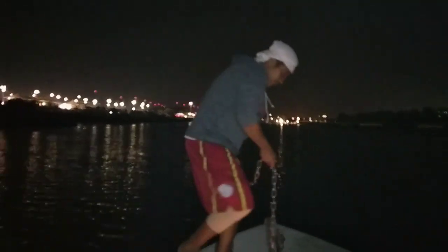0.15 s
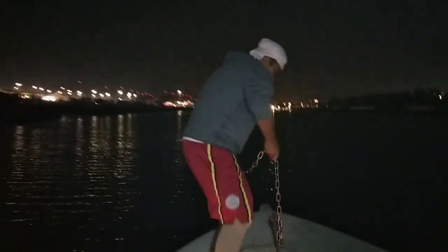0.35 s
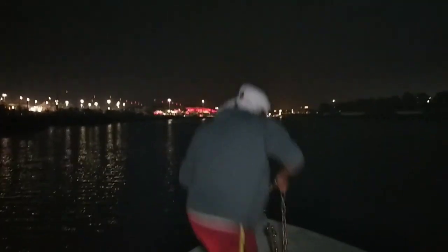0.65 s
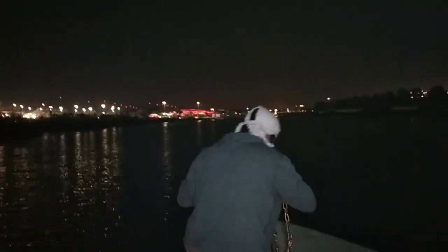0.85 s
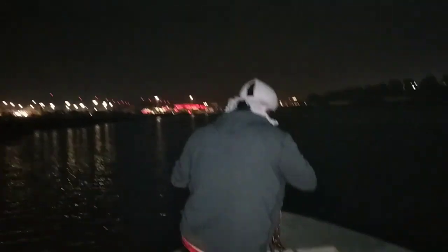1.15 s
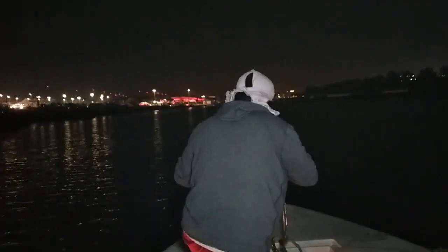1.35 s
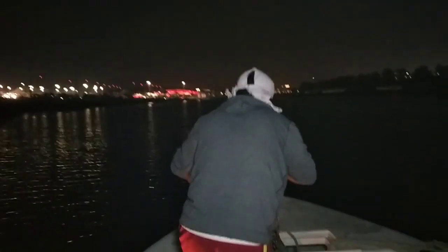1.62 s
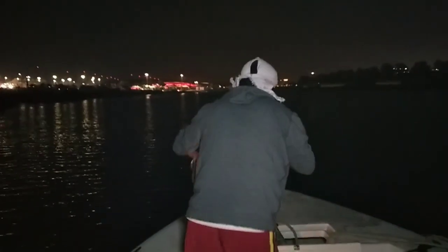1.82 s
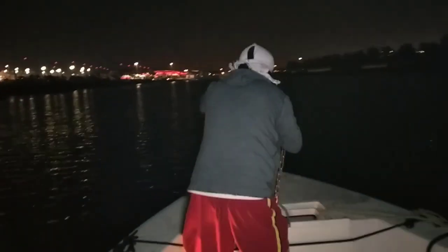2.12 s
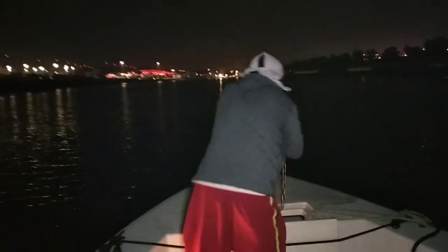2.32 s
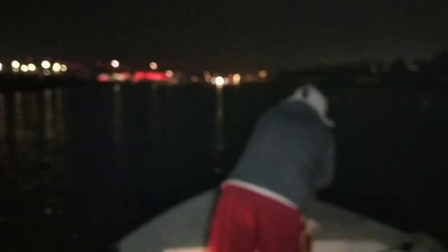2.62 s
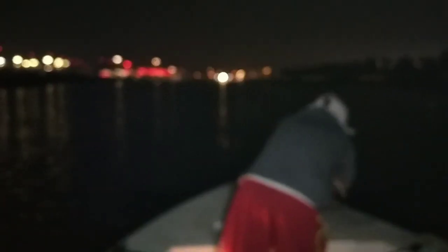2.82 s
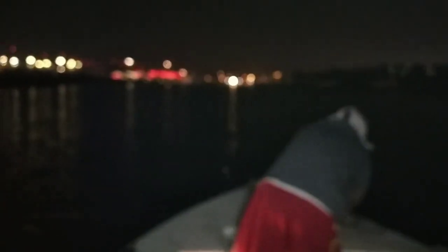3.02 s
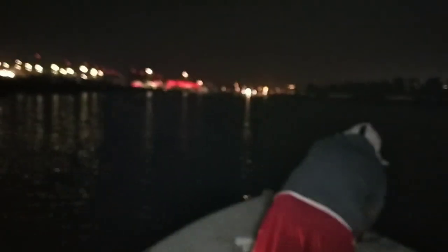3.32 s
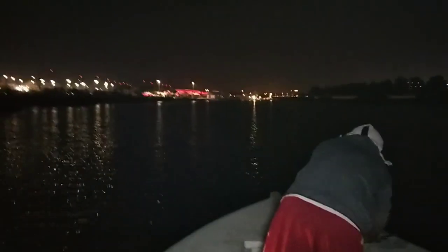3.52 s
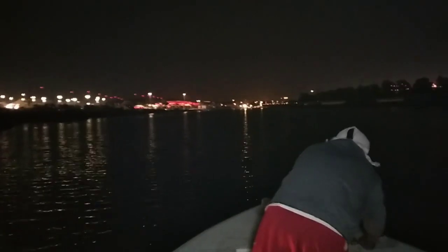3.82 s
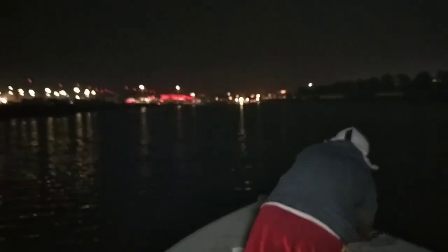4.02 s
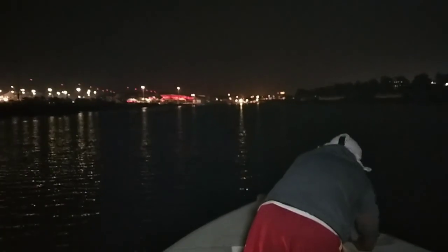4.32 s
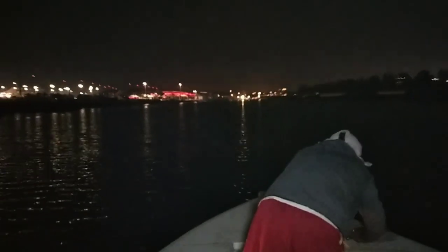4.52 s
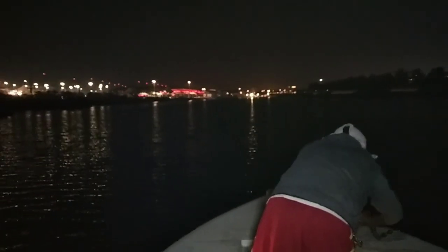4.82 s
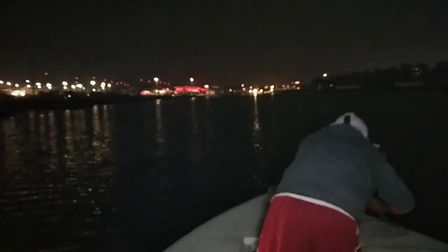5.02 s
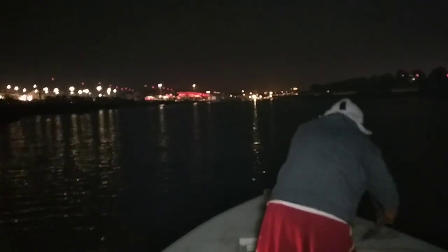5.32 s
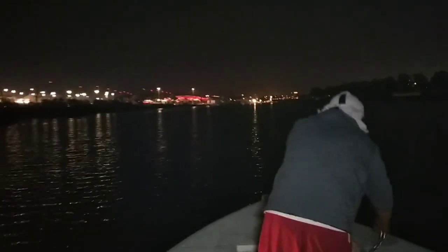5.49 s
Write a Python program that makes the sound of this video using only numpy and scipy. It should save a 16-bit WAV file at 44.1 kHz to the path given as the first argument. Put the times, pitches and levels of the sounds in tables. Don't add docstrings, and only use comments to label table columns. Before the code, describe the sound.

Anchor chain links rattle, knock and clack on a hollow boat bow in several rough pulls, between quieter pauses with low wind buffeting.

```python
import sys
import numpy as np
from scipy import signal
from scipy.io import wavfile

SR = 44100
rng = np.random.default_rng(int(sys.argv[2]) if len(sys.argv) > 2 else 0)


def gain_from_db(level_db):
    decades = np.asarray(level_db, float) / 20
    return 10 ** decades


def persist_wave(psi):
    counts = np.round(np.clip(psi, -1, 1) * 32767).astype(np.int16)
    wavfile.write(sys.argv[1], SR, np.atleast_2d(counts).T)


N = 249253
DECK_TOP_HZ = 3400

# time_s, force_db, slack_db
PULL_1 = [
    (0.447, -84, -55),
    (0.462, -22.5, -53.5),
    (.538, -26, -18),
    (.6, -24, -21),
    (.664, -26, -8),
    (.808, -20.5, -10),
    (0.9, -36.5, -11),
    (1.081, -47.5, -22),
]
PULL_2 = [
    (1.089, -48, -55),
    (1.118, -34, -10),
    (1.268, -18.5, -30.5),
    (1.358, -12.5, -15.5),
    (1.44, -40, -23.5),
    (1.461, -22.5, -8),
    (1.549, -39, -15.5),
    (1.61, -65, 4),
]
PULL_3 = [
    (2.584, -51.5, -29.5),
    (2.591, -12.5, -38),
    (2.642, -12, -24.5),
    (2.762, -12, -14.5),
    (2.954, -11, -11.5),
    (3.182, -20, -8.5),
    (3.265, -17, -15.5),
    (3.315, -18.5, -10),
    (3.491, -61.5, -8),
]
PULL_4 = [
    (4.22, -53, -27),
    (4.286, -37.5, -39),
    (4.312, -17, -28),
    (4.45, -21.5, -20),
    (4.594, -18, -27.5),
    (4.694, -13.5, -13),
    (4.816, -21.5, -18),
    (4.862, -21, -8.5),
]
PULL_5 = [
    (4.862, -20, -28),
    (4.934, -12.5, -14),
    (4.998, -36, 2),
    (5.016, -26, -10.5),
    (5.032, -7.5, -22),
    (5.136, -15, -9.5),
    (5.156, -18, -20.5),
    (5.254, -31, -21),
]
PULL_6 = [
    (5.254, -39.5, -23),
    (5.285, -19, -11),
    (5.31, -19, -22),
    (5.39, -19, -42),
    (5.429, -9.5, -16),
    (5.484, -26, -25.5),
    (5.507, -13.5, -19),
    (5.558, -24.5, -7.5),
    (5.65, -88.5, 51.5),
]
# deck_weight_db, link_hardness_db, left_minus_right_db
PULL_LAYS = [
    (1.5, -2.5, 1.5),
    (-9.5, -2, 2.5),
    (6.5, 2, 4.5),
    (4.5, -2.6, 2),
    (-0.5, 2.5, 2.5),
    (6.5, 2, 3),
]
# start_s, force_db, slack_db, held_s, left_minus_right_db
SLIPS = [(0.011, -24, -35, 0.01, 2.5), (0.192, -49.5, -12, 0.021, 3), (0.231, -57.5, 6, 0.0071, 11),
         (.29, -61, 13, 0.0072, 2), (1.887, -31.5, -16, 0.03, 1), (1.983, -33, -16, 0.041, 10.5),
         (2.155, -23, -11, 0.03, -0.5), (2.468, -60.5, 12, 0.023, 15), (3.457, -52, -4, 0.029, 2),
         (3.568, -45, -21, 0.0054, 4), (3.601, -31, -2.5, 0.023, 2.5), (3.679, -38.5, -30, 0.035, 3),
         (3.817, -36, -36, 0.035, 5), (3.892, -46, -27, 0.0064, 5), (4.011, -40.5, -43, 0.034, 0.5),
         (4.134, -48.5, -32, 0.018, 1), (4.152, -62, 5, 0.017, 2), (1.76, -54, 2, .015, 8),
         (1.85, -51.5, -35, 0.011, 6), (.395, -66, 5, .012, -3), (3.536, -52, -6, 0.027, 7),
         (3.44, -50, -47, 0.12, 2), (3.76, -53.5, -53, 0.042, -1)]
# start_s, length_s, level_db
SLIDES = [(1.551, 0.16, -53), (1.74, 0.15, -68), (2.215, 0.22, -61.5), (2.46, 0.07, -53.5),
          (.95, 0.091, -59), (3.668, 0.057, -60), (0, 0.069, -55), (0.193, .075, -74), (.29, 0.035, -79),
          (1.03, 0.063, -61), (3.462, 0.036, -59), (3.826, 0.051, -62), (4, .05, -68), (.105, 0.0062, -66),
          (.397, .012, -75), (3.542, 0.027, -71), (4.09, 0.017, -74.5), (4.15, 0.013, -73),
          (4.25, .03, -76)]
# time_s, pitch_hz
BEARING = [(.46, 990), (.56, 1000), (.65, 1500), (.9, 1470), (1.12, 950), (1.26, 1230), (1.4, 1230),
           (1.5, 1386), (2.6, 1145), (2.72, 1060), (2.8, 1500), (3.35, 1510), (4.3, 1250), (4.8, 1070),
           (4.9, 1400), (5.24, 1340), (5.3, 676), (5.42, 970)]
# pitch_hz, level_db
DECK = [(150, -6), (290, -1), (490, -2), (825, -1), (1400, 3), (2050, -1), (2600, -8), (3300, -19)]
# pitch_hz, level_db, t60_s
PLATES = [(289.3, -3, 0.13), (602.5, -3, 0.11), (681.6, -1.5, 0.071), (819.4, -4.5, 0.056),
          (917, -2.5, 0.043), (1040, -4.5, 0.045), (1234, -2.5, 0.04), (1330, -2.5, 0.052),
          (1463, -4.5, 0.065), (1561, -4.5, 0.02), (1843, 0, 0.031), (2047, 0, 0.026), (2425, 0, .04),
          (2790, -6, .04)]
# pitch_hz, level_db
CLACK = [(3000, 5.5), (4500, 2.5), (6300, -4.5), (7600, -0.5), (10000, -8), (12800, 3), (14100, -3),
         (15400, -29.5)]
# pitch_hz, level_db, t60_s
LINKS = [(10900, -15, .03), (11190, 1.5, 0.043), (11200, 5, 0.13), (11430, 1.5, 0.044),
         (11340, -6.5, 0.039), (11650, 6, 0.071), (11620, -0.5, .04), (11720, -1.5, 0.026),
         (10600, -12.5, .02), (12400, -11, 0.056), (12150, -26, .015), (12850, -23, .02)]
# centre_hz, t60_s, left_minus_right_db
SPOTS = [
    (584, 0.065, -2),
    (1000, 0.062, -4.7),
    (1395, 0.056, -2.5),
    (1500, 0.04, 4.5),
    (1980, 0.054, 1),
    (1340, 0.032, 4),
]
# time_s, peak_db
ON_FLOORBOARD = [(1.951, -22.5), (1.984, -34), (2.024, -12), (3.086, -8), (4.274, -30), (4.853, -15),
                 (5.292, -10.5), (5.321, -4), (5.341, -2), (5.367, 2.5), (5.384, -6.5), (5.53, -9)]
ON_THWART = [(0.013, -26), (0.46, -6), (0.493, -17.5), (0.52, -31), (0.599, -16), (1.117, -32),
             (1.126, -23), (1.163, -33.5), (1.186, -12), (1.317, -5), (1.345, -2.5), (1.396, -10),
             (2.724, -2), (2.827, -10), (4.348, -3), (4.411, -8), (4.65, -0.5), (4.758, -5.5),
             (4.819, -13.5), (5.454, -10), (5.508, -6)]
ON_FOREDECK = [(0.711, -15), (0.735, -0.5), (1.219, -8), (1.243, -4), (1.895, -18), (2.59, 2),
               (2.626, -1.5), (2.679, 0.5), (2.848, -14), (2.885, -7.5), (2.904, -10.5), (2.924, -4.5),
               (3.14, -7), (3.201, -18), (4.016, -17), (4.309, -17), (5.18, -12), (5.492, -6)]
ON_GUNWALE = [(0.57, -8.5), (1.025, -19.5), (1.3, 1.5), (2.153, -6), (2.781, -6), (2.814, -1.5),
              (2.947, -7.5), (3.058, -20.5), (3.245, 0), (3.253, -3.5), (3.305, -16), (3.324, -10),
              (3.602, -23), (3.681, -22), (4.362, -2), (5.41, -1)]
ON_STEM = [(0.648, -2.5), (0.68, -8), (0.777, -14), (0.798, -5), (0.852, -15.5), (2.659, 1.5),
           (2.702, -1.5), (2.733, -1.5), (2.977, -11.5), (3.005, -7), (3.175, -24), (4.676, -7.5),
           (4.838, -15), (5.082, -3.5), (5.266, -21.5)]
ON_HATCH = [(1.453, -10.5), (2.643, -1.5), (3.112, -10.5), (4.474, -25), (4.485, -15.5), (4.497, -17),
            (4.527, -15), (4.547, -17), (4.57, -25), (4.6, -5.5), (4.872, 2), (4.894, 3), (4.916, 4.5),
            (4.934, -5), (5.022, 6.5), (5.03, 2), (5.063, -4), (5.242, -22), (5.283, -10.5), (5.429, -7),
            (5.444, -5)]
# time_s, peak_db, pitch_hz, until_silent_s, left_minus_right_db
TAPS = [(.147, -32, 524, 0.048, -5), (.177, -49, 2090, 0.023, -2), (.205, -47.5, 2310, 0.019, -6),
        (.291, -42.5, 1560, 0.035, 3), (.013, -48, 7400, 0.034, 10), (.232, -75, 4600, .05, 4),
        (.232, -65, 11000, .05, 8), (.355, -38, 580, 0.023, -2), (0.952, -36, 11200, 0.068, -25),
        (1.537, -20.5, 1040, 0.021, 12), (1.762, -49, 5500, 0.066, 13), (1.761, -53, 7250, 0.05, 22),
        (1.763, -76, 3920, .04, 4), (1.764, -40.5, 1500, 0.019, 13), (4.248, -28.5, 581, 0.047, 8),
        (4.913, -6.5, 1223, 0.052, 3), (5.087, -16.5, 1314, 0.11, 9.5), (5.135, -12.5, 284, 0.12, 5.5),
        (5.38, -12, 800, 0.035, 2), (5.3, -24, 475, 0.056, 4), (5.346, -15, 373, .08, 2),
        (5.41, -19.5, 258, 0.22, 0)]
# time_s, peak_db, left_minus_right_db
CLICKS = [(.648, -30, 5), (1.22, -25, 4.5), (1.302, -25.5, 1), (1.525, -20, 12), (1.538, -9, 3),
          (1.584, -42, 11), (1.597, -29.5, 10), (2.5, -31, 11.5), (2.006, -26.5, 11), (2.44, -41, 4),
          (3.6, -35, 12), (2.704, -20.5, -1), (2.783, -22, 3), (3.244, -19.5, 3), (3.305, -10, -1),
          (4.411, -21.5, 9), (4.524, -20.5, 8), (5.3, -29, 7), (6, -18, 6), (4.915, -21, -2),
          (5.021, -16.5, 7), (5.343, -22, -2), (5.367, -12.5, 1), (5.412, -21.5, -3), (6.1, -24, 0),
          (4.9, -24.5, -5)]
# from_s, delay_samples
LAGS = [
    (2.5, 4),
    (4.2, 5),
]
# pitch_hz, left_minus_right_db
PORTS = [(200, -0.5), (2000, -1), (4200, -1), (6400, 7), (8000, 6), (9800, -6), (15000, -5)]
# time_s, level_db, left_minus_right_db
BREEZE = [(0.0, -39, -5), (.36, -43.5, -12.5), (.6, -32.5, -13), (.74, -12.5, 7.5), (.89, -31, -24),
          (1.16, -36.5, 23), (1.35, -7, 11.5), (1.57, -47, -23), (1.77, -39.5, -2), (2.1, -26, -9.5),
          (2.38, -26.5, -5), (2.47, -52, -48), (2.56, -29.5, -3.5), (3.24, -21.5, 13), (3.57, -34, -11.5),
          (3.95, -41, -8), (4.83, -40.5, 3), (5.65, -37.5, -9.5)]
# time_s, level_db,
# length_ms
PUFFS_LEFT = [(.594, -16, 24), (.651, -3, 26), (.791, -16.5, 110), (.911, -23, 39), (1.119, -20, 47),
              (1.378, -11.5, 55), (1.432, -5, 42), (1.568, -22.5, 95), (1.686, -9, 22), (1.916, -5.5, 28),
              (2.019, -3, 32.6), (2.2, -3.5, 24.3), (2.307, -5, 27), (2.359, -7.5, 13), (3.088, -7, 31),
              (3.196, -20, 12), (3.272, -5, 18), (3.377, -8.5, 23.5), (3.439, -13.5, 20),
              (3.713, -20.5, 10), (3.908, -10.5, 14.6), (5.455, -16.5, 29), (5.57, -25, 15),
              (3.78, -29.5, 29)]
PUFFS_RIGHT = [(.033, -14, 3.4), (.592, -4.5, 33.5), (.699, -11, 83), (.795, -6.5, 56), (1.289, -4, 18),
               (1.411, -6, 56), (1.612, -19, 13), (1.676, -19.5, 13), (1.785, -18.5, 19), (1.944, -3.5, 29),
               (2.011, -8, 32), (2.05, -9.5, 34), (2.133, -4, 6), (2.246, -6, 12), (2.311, -11.5, 34),
               (2.446, -19.5, 19), (2.932, -13.5, 35), (3.15, -23, 19), (3.369, -14.5, 19),
               (3.539, -38, 20), (4.03, -28, 13), (.279, -30, 32), (4.994, -26, 32), (4.635, -14, 5.9)]
# pitch_hz, density_db_per_hz
HARBOUR = [(60, 4), (200, -20), (500, -14), (1000, -19.5), (2000, -33), (2800, -80), (4000, -79.5)]


def chain():
    panel_hz = spread_modes(167.45, 3370, count=34)
    haul = hauling()
    hits = knock_rows(haul)
    body_hz = np.append(panel_hz, [plate[0] for plate in PLATES])
    left, right = rattle(panel_hz, haul, hits) + knocks(body_hz, hits) + taps() + clicks()
    lag = np.zeros(N, int)
    for s, samples in LAGS:
        lag[int(s * SR):] = samples
    return np.array([left, right[np.arange(N) - lag]])


def hauling():
    t = np.arange(N) / SR
    still = 0 * t
    moves = [[still - 63, still - 48, still, still, still]]
    pulls = (PULL_1, PULL_2, PULL_3, PULL_4, PULL_5, PULL_6)
    for pull, lay in zip(pulls, PULL_LAYS):
        force_db, slack_db = in_time(pull)
        idle = (t < pull[0][0]) | (t > pull[-1][0])
        moves.append([force_db - 200 * idle, slack_db, *(v + still for v in lay)])
    rise_db_per_s, fall_db_per_s = 5001, 586
    for s, force_db, slack_db, held, side_db in SLIPS:
        edges = np.minimum(rise_db_per_s * (t - s), fall_db_per_s * (s + held - t))
        shape = np.minimum(edges, 0)
        moves.append([force_db + shape, slack_db + still, still, still, side_db + still])
    moves = np.array(moves)
    strongest = np.argmax(moves[:, 0], axis=0)
    force_db, slack_db, weight_db, hard_db, side_db = moves[strongest, :, np.arange(N)].T
    faint = np.maximum(-43 - force_db, 0)
    deep_db = weight_db + 0.47 * (-11 - slack_db) + 0.44 * faint
    jingle_db = slack_db - 0.3 * faint
    clack_db = np.maximum(force_db - 13 + hard_db + 0.56 * jingle_db, sliding())
    return force_db, deep_db, force_db + jingle_db, clack_db, side_db


def sliding():
    t = np.arange(N) / SR
    fade_db, edge_db_per_s = 5, 1500
    levels = []
    for s, length, level_db in SLIDES:
        edges = np.minimum(np.minimum(t - s, s + length - t), 0)
        levels.append(level_db - fade_db * (t - s) / length + edge_db_per_s * edges)
    return np.max(levels, axis=0)


def rattle(panel_hz, haul, hits):
    deck_db, deep_db, ring_db, clack_db, side_db = haul
    out = np.zeros((2, N))
    at, size = contacts(per_s=1100, spread_db=4.0, clump_db=1.19)
    for hz in panel_hz:
        t60 = 0.035 * (1000 / hz) ** 1.38
        deep = deep_db[at] / (1 + (hz / 650) ** 4)
        gains = size * pan(side_db[at]) * gain_from_db(deck_db[at] + deep + at_hz(DECK, hz) - 24.0)
        out += strike(at, gains * even(t60) * (hz / 1000) ** .5, hz, t60, apart=0.42 * hz / 1000 + 0.21)
    bearing_hz, = in_time(BEARING)
    for hz, level_db, t60 in PLATES:
        octaves_off = np.log2(hz / bearing_hz[at])
        near = np.exp(-(octaves_off / .5) ** 2)
        gains = size * pan(side_db[at]) * gain_from_db(deck_db[at] + level_db - 9) * (near + 0.32)
        out += strike(at, gains * even(t60), hz, t60, apart=0.45 * hz / 1000 + 0.12)
    out = steep(out, DECK_TOP_HZ, "low")

    at, size = contacts(per_s=2800, spread_db=1.5, clump_db=2.5)
    top = np.zeros((2, N))
    t60, top_hz = .009, 12900
    for hz in np.append(spread_modes(3150, 14800, count=22), [4510, 7540, 13300, 13900]):
        roller = np.exp(-(np.log2(hz / 4650) / .22) ** 2)
        hard = 0.7 * (clack_db[at] + 36) * roller
        hard += 2.8 * np.minimum(ring_db[at] + 29, 0) * (hz > top_hz)
        level_db = clack_db[at] + hard + at_hz(CLACK, hz) - 13 + 3.0 * drift(5.1)[at]
        gains = size * pan(side_db[at]) * gain_from_db(level_db)
        clack = strike(at, gains * even(t60) * (hz / 5000) ** .5, hz, t60, apart=0.99)
        if hz > top_hz:
            top += clack
        else:
            out += clack
    out += steep(jingle(at, size, ring_db, hits), 9800, "high")
    out = steep(steep(out, top_hz, "low"), top_hz, "low")
    return out + steep(top, [top_hz, 15400], "band")


def jingle(at, size, ring_db, hits):
    s, peak_db, centre_hz, share_db, knock_side_db, knock_t60 = np.transpose(hits)
    both = np.append((s * SR).astype(int), at)
    out = 0
    for hz, level_db, t60 in LINKS:
        t60 = min(t60, .06)
        from_knocks = gain_from_db(peak_db + share_db - 19.5)
        from_contacts = size * gain_from_db(ring_db[at] - 5.5) * even(t60)
        gains = np.append(from_knocks, from_contacts)
        out = out + strike(both, gains * gain_from_db(level_db), hz, t60, apart=0.98)
    return out


def knock_rows(haul):
    places = (ON_FLOORBOARD, ON_THWART, ON_FOREDECK, ON_GUNWALE, ON_STEM, ON_HATCH)
    jingle_db = haul[2] - haul[0] + 2.5
    rows = []
    for hits, (hz, t60, side_db) in zip(places, SPOTS):
        for s, peak_db in hits:
            rows.append((s, peak_db, hz, jingle_db[int(s * SR) + 88], side_db, t60))
    return rows


def knocks(body_hz, hits):
    out, t, hz = np.zeros((2, N)), np.arange(4410) / SR, body_hz[:, None]
    luck = rng.standard_normal((len(hits), 3, len(body_hz), 1))
    cracks = steep(rng.standard_normal((len(hits), 2, 4410)), [1800, 9000], "band")
    for hit, (size, turn, lag), crack in zip(hits, luck, cracks):
        s, peak_db, centre_hz, share_db, side_db, t60 = hit
        colour = gain_from_db(0.4 * at_hz(DECK, hz) - 24 * np.log2(hz / centre_hz) ** 2 + 2.0 * size)
        colour[:-len(PLATES)] *= gain_from_db(-7)
        decay = gain_from_db(-60 * t / t60 * (hz / centre_hz) ** 0.13)
        body = colour * decay * (1 - np.exp(-t / 0.00028))
        ports = []
        for k in (-1, 1):
            phase = 0.9 * turn + k * .4 * lag
            ports.append(np.sum(body * np.sin(2 * np.pi * hz * t + phase), axis=0))
        ports = steep(np.array(ports), DECK_TOP_HZ, "low")
        ports = ports / np.sqrt(np.mean(ports[:, :264] ** 2)) * gain_from_db(-7.5)
        crack = crack * gain_from_db(0.28 * share_db - 26.5 - 60 * t / .012)
        sides = pan(np.clip(side_db, -12, 12))[:, None]
        add(out, s, gain_from_db(peak_db - 2.0) * sides * (ports + crack))
    return out


def taps():
    out, t = np.zeros((2, N)), np.arange(8820) / SR
    for s, peak_db, hz, t60, side_db in TAPS:
        pair = np.sin(2 * np.pi * hz * t) + .4 * np.sin(2 * np.pi * (hz + 40) * t)
        shape = gain_from_db(peak_db - 60 * (t / t60) ** 2) * (1 - np.exp(-t * hz / 4))
        add(out, s, pan(side_db)[:, None] * shape * pair)
    return out


def clicks():
    out, t = np.zeros((2, N)), np.arange(882) / SR
    snaps = steep(rng.standard_normal((len(CLICKS), 2, 882)), [1200, 12800], "band")
    snaps = signal.sosfilt(signal.butter(1, 4640, fs=SR, output="sos"), snaps)
    t60 = .011
    for (s, peak_db, side_db), snap in zip(CLICKS, snaps):
        shape = gain_from_db(peak_db - 60 * t / t60)
        add(out, s, pan(side_db)[:, None] * shape * (snap[0] + 0.13 * snap))
    return out


def spread_modes(low_hz, high_hz, count):
    return np.geomspace(low_hz, high_hz, count) * gain_from_db(0.22 * rng.standard_normal(count))


def contacts(per_s, spread_db, clump_db):
    rate = np.minimum(per_s * gain_from_db(clump_db * drift(25)), 5000)
    at = np.flatnonzero(rng.random(N) < rate / SR)[:N // 12]
    sizes = gain_from_db(spread_db * np.minimum(rng.exponential(1, N), 4))[at]
    return at, sizes * np.sqrt(N / np.sum(sizes ** 2))


def strike(at, gains, hz, t60, apart):
    clicks = np.zeros((2, N))
    luck = rng.standard_normal((2, N // 11))[:, :len(at)]
    apart = np.clip(apart, 0, 1)
    right = np.sqrt(1 - apart ** 2) * luck[0] + apart * luck[1]
    clicks[:, at] = gains * np.array([luck[0], right])
    return ring(clicks, hz, t60) * pan(at_hz(PORTS, hz))[:, None]


def ring(clicks, hz, t60):
    r, w = gain_from_db(-60 / (t60 * SR)), 2 * np.pi * hz / SR
    return signal.lfilter([0, np.sin(w)], [1, -2 * r * np.cos(w), r * r], clicks + 1e-18)


def even(t60):
    return np.sqrt(4 * np.log(1000) / (t60 * SR))


def wind():
    level_db, side_db = in_time(BREEZE)
    low = soft_band(rng.standard_normal((2, N)), 17, 120, order=1)
    lumps = gain_from_db(7.9 * np.array([drift(25), drift(8.8)]))
    breeze = rms_one(steep(low * lumps, 441, "low")) * gain_from_db(level_db) * pan(side_db)
    return breeze + np.array([puffs(PUFFS_LEFT), puffs(PUFFS_RIGHT)])


def puffs(table):
    out, t = np.zeros(N + 8192), np.arange(-4096, 4096) / SR
    noise = rng.standard_normal((len(table), 8192))
    for (s, level_db, ms), white in zip(table, noise):
        hz = 162 * 2 ** (0.41 * level_db) * (30 / ms) ** 0.52
        lumps = soft_band(white, 0.72 * hz, 2.94 * hz, order=1)
        lumps = steep(steep(lumps, 379, "low"), 600, "low")
        shape = np.exp(-(t * 1000 / (0.76 * ms)) ** 2)
        lumps = lumps / np.sqrt(np.sum((lumps * shape) ** 2) / np.sum(shape ** 2))
        start = int(s * SR)
        out[start:start + 8192] += gain_from_db(level_db) * shape * lumps
    return out[4096:4096 + N]


def harbour():
    out, edges = 0, 50 * 2 ** np.arange(0, 6.6, .5)
    white = rng.standard_normal((2, 2, N))
    for k, (low, high) in enumerate(zip(edges, edges[1:])):
        mid, side = soft_band(white[k % 2], low, high, order=2)
        gain = gain_from_db(at_hz(HARBOUR, np.sqrt(low * high)) + 2.2 * drift(13.0))
        out = out + gain * (mid + 0.85 * side * [[1], [-1]])
    return gain_from_db(-48) * steep(rms_one(out), 2700, "low")


def drift(rate):
    r = np.exp(-80 * np.pi * rate / SR)
    white = rng.standard_normal(N // 40 + 2002)
    slow = signal.lfilter([1], [1, -2 * r, r * r], white)[2000:]
    return np.interp(np.arange(N) / 40, np.arange(len(slow)), rms_one(slow))


def rms_one(x):
    return x / np.sqrt(np.mean(x ** 2) + 1e-20)


def in_time(rows):
    s, *columns = np.transpose(rows)
    return [np.interp(np.arange(N) / SR, s, c) for c in columns]


def at_hz(points, hz):
    point_hz, point_db = np.transpose(points)
    return np.interp(np.log(hz), np.log(point_hz), point_db)


def pan(db):
    return gain_from_db(np.array([db / 2, -db / 2]))


def steep(x, hz, kind):
    return signal.sosfilt(signal.butter(6, hz, kind, fs=SR, output="sos"), x)


def soft_band(x, low_hz, high_hz, order):
    return signal.sosfilt(signal.butter(order, [low_hz, high_hz], "band", fs=SR, output="sos"), x)


def add(out, s, sound):
    i = int(s * SR)
    out[:, i:i + sound.shape[1]] += sound[:, :N - i]


def scene():
    return chain() + wind() + harbour()


def low_pass(x):
    return signal.sosfilt(signal.butter(12, 15530, fs=SR, output="sos"), x)


def record(dry):
    squeezed = dry / (1 + np.abs(dry / .99) ** 6) ** (1 / 6)
    return low_pass(steep(squeezed, 15480, "low"))


dry = scene()
out = record(dry)
persist_wave(out)
```